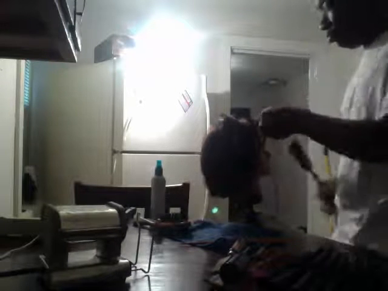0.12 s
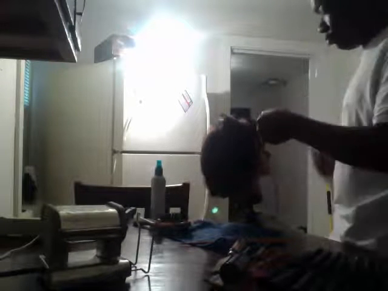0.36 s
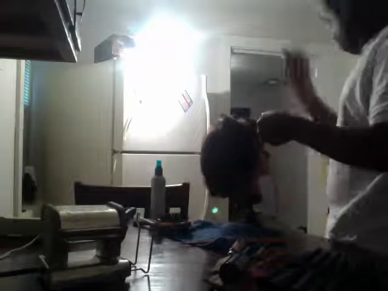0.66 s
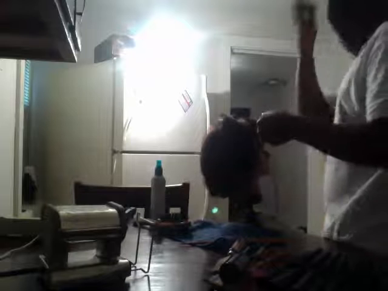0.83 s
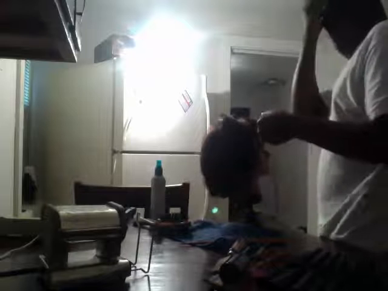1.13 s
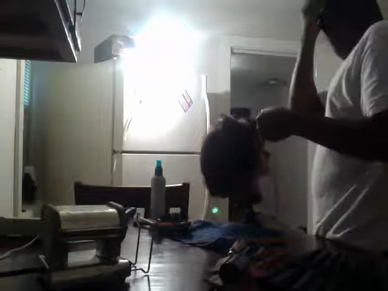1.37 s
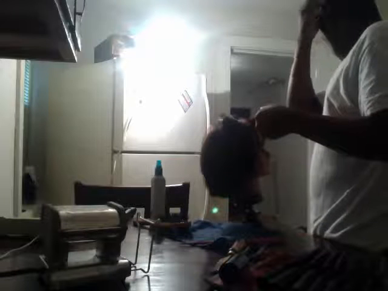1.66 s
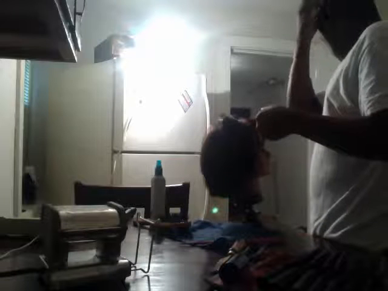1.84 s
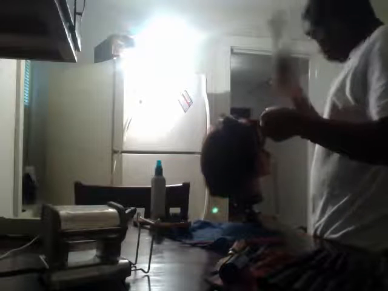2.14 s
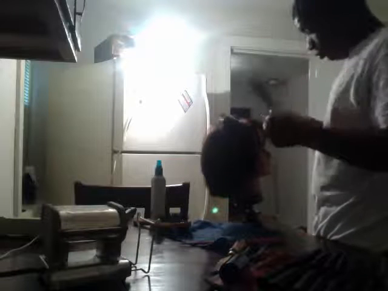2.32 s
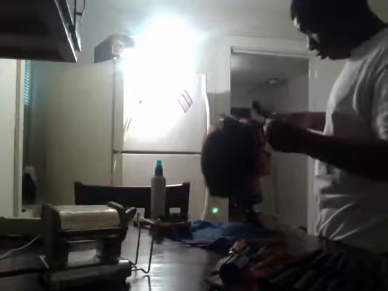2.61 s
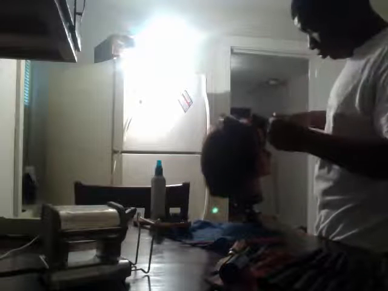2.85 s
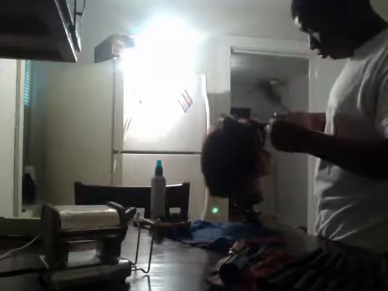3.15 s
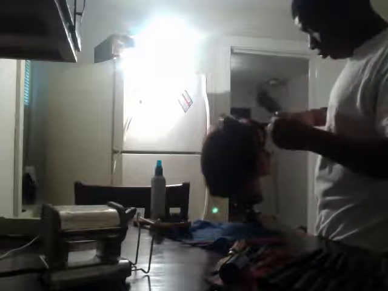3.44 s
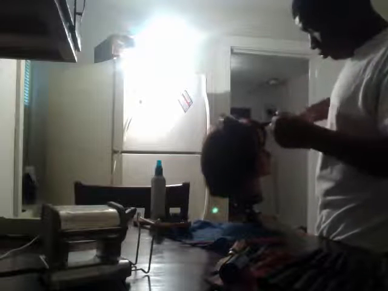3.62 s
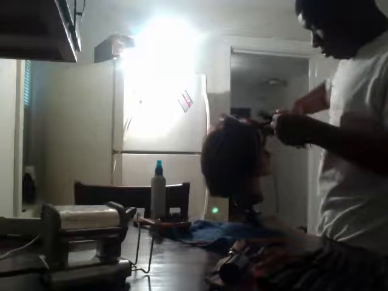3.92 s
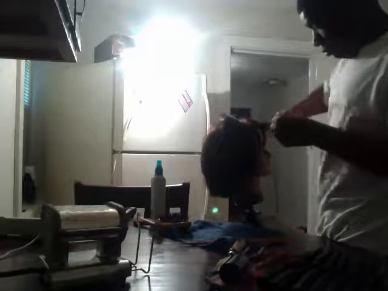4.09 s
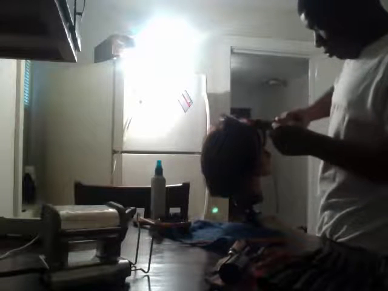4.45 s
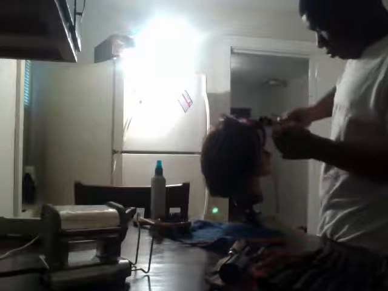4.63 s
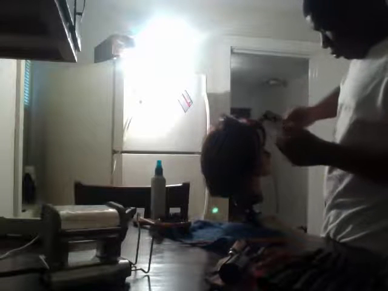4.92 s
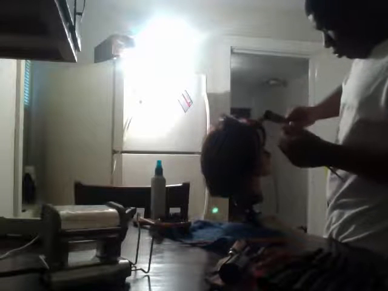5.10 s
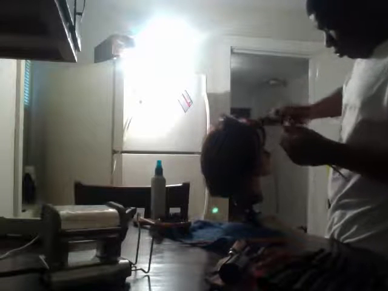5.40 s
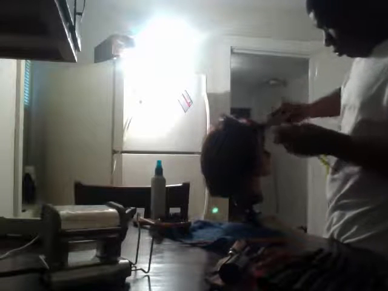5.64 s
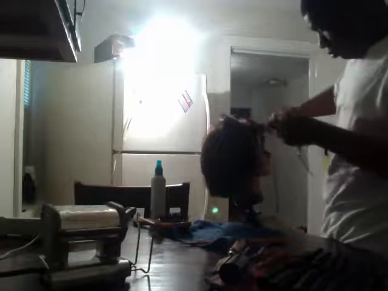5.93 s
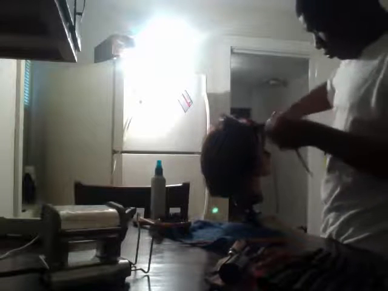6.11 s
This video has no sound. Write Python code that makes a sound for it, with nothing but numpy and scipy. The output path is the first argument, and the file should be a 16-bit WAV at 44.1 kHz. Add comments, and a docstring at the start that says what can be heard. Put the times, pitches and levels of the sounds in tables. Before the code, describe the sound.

A comb clicks crisply through a mannequin's hair, its stand knocking softly on the table, while a refrigerator hums quietly in the room.

```python
"""Sharp plastic snaps over hiss and hum: a comb and hands work through the hair of a mannequin head.
Each snap is a noise-like impulse shaped by the comb's resonances, with three ringing teeth and a wall tail.
Tugs rock the head's stand on the kitchen table in dull thuds: decaying modes under a knock of noise.
The comb scratches faintly by random ticks; fridge hum and room hiss are filtered noise that swells and sinks."""
import sys
import numpy as np
from scipy import signal
from scipy.fft import rfft, irfft
from scipy.io import wavfile

SR = 44100
rng = np.random.default_rng(int(sys.argv[2]) if len(sys.argv) > 2 else 0)


def waveform_to_disk(signal):
    """Save audio, clipped to [-1, 1], as 16-bit WAV at the path in sys.argv[1]."""
    frames = np.transpose(np.atleast_2d(signal))
    scaled = np.clip(frames, -1, 1) * 32767
    samples = np.round(scaled).astype(np.int16)
    wavfile.write(sys.argv[1], SR, samples)


N = 276066
T = np.arange(N) / SR  # time, s

# Slow swell of the background: time_s, level_db
BACKGROUND_SWELL = [(0.0, -61), (0.71, -61), (1.18, -63.5), (2.09, -62.5), (2.41, -63.5), (2.79, -69),
                    (3.07, -66.5), (3.42, -61.5), (3.75, -61.5), (3.99, -64.5), (4.39, -63.5),
                    (4.97, -68.5), (5.21, -65.5), (5.46, -60.5), (6.14, -64), (6.26, -67)]
# Spectrum of the room hiss: frequency_hz, relative_density_db (per Hz)
HISS_SPECTRUM = [(75, -36), (100, -20), (125, -5.5), (176, -0.5), (215, -7.5), (271, -7), (347, 0),
                 (462, -6.5), (823, -6.5), (1170, -13.5), (1600, -11), (1950, -19.5), (5700, -28),
                 (9740, -36.5), (14400, -51)]
# Fridge resonances: centre_hz, width_hz, level_db (relative to the swell)
FRIDGE_MODES = [(118, 4, -11.5), (169, 26, -8.5), (350.2, 3.9, -6), (549.7, 3.9, -10.5), (807, 6.3, -11),
                (1061, 40, -10.5), (1435.4, 37, -20), (3280, 25, -25), (5460, 27, -22), (7200, 200, -24.5)]
# Decay of the kitchen by frequency band: centre_hz, width_hz, t60_s
KITCHEN_DECAY = [(1190, 270, 0.21), (1980, 1600, 0.44), (3970, 1900, 0.4), (6230, 3000, 0.4),
                 (8700, 5500, 0.3), (11540, 2600, 0.38), (15000, 2300, 0.26)]
# Rocking of the stand: time_s, level_db, deep_lift_db, damping_factor (multiplies the decay rate)
STAND_THUDS = [(0.151, -48.5, 3, 0.75), (0.486, -41.5, 9, 6.6), (0.526, -50, 7, 4.6), (2.199, -46, 2.5, 1),
               (2.25, -57.5, 14, 1.05), (2.329, -57.5, 0, 0.85), (2.448, -61, -4.5, 0.69),
               (2.912, -60, -0.5, 1), (3.208, -45, -2.5, 1.06), (3.25, -68.5, 20.5, 3.1),
               (3.524, -57, 2.5, 0.9), (3.61, -64.5, 1.5, 0.31), (4.168, -68, -14, 0.7),
               (5.518, -65, -9, 0.98), (5.739, -75, 25, 0.69)]
# Modes of stand and table: frequency_hz, level_db, t60_s (at damping 1), lift_share (of deep_lift_db)
STAND_MODES = [(62, -39.5, .12, .8), (105, -11, 0.1, 1.2), (166.5, 0, 0.22, .9), (250.5, 8.5, 0.1094, 0),
               (380, -7.5, 0.066, .3)]
# Comb strokes through the hair: peak_s, level_db, top_relative_db, swell_s, fade_s
COMB_STROKES = [(0.95, -76.5, -19, .01, 0.045), (1.07, -82, -30, .08, .12),
                (1.29, -73.5, -3.5, 0.083, 0.047), (1.19, -85.5, -14, .1, .1),
                (1.414, -79.5, -19, 0.055, 0.13), (1.538, -80, -19, .1, 0.29), (1.7, -89, -15, .08, .08),
                (1.83, -72.5, 2.5, 0.05, 0.053), (1.92, -79, -10, .1, 0.14),
                (2.126, -85.5, -40, 0.13, 0.34), (5.342, -79, -11, .15, .08), (5.492, -82, -24, .02, .06)]
# Teeth snapping free of tangles: time_s, nominal_peak_db, body_db, edge_db, air_db (colours relative to
# 5.5 kHz), tooth_1_hz, tooth_2_hz, tooth_3_hz, ring_db, crack_db, echo_lag_ms, echo_share (capped at 0.9)
TOOTH_SNAPS = [(0.026, -48, 1.5, 1.5, -39, 7130, 3460, 5000, 1.5, 5, 0.33, 0.22),
               (0.0447, -52, 8, 11, -11, 6800, 2530, 13100, -3, 9, 0.37, 0.3),
               (0.0655, -52, -3, 4.5, -14, 5337, 6350, 10000, -1.5, 13, 0.34, 0.33),
               (0.2384, -19, -2, -1, 15.5, 5600, 6800, 14700, -8.5, 12, 0.47, 0.23),
               (0.2416, -17, -5, -0.5, 4.5, 4520, 14400, 8700, -7.5, 13, 0.45, 0.086),
               (0.2538, -22.5, -19.5, 2.5, -4.5, 7000, 9430, 5980, -7, 9.5, 0.43, 0.12),
               (0.4316, -49, -15, -26, -17, 3600, 4400, 8000, -3.5, 15.8, 0.24, 0.11),
               (0.5233, -32, -14, 0, 6.5, 5600, 4220, 9400, -6, 6.8, .47, 0.3),
               (0.5376, -33.5, -20, -5.5, -3, 5700, 7200, 14500, -18, 4.6, 0.6, .13),
               (0.6198, -47, 3.5, -12, -18, 4210, 7140, 5670, -5, 15.5, 0.44, 0.29),
               (0.725, -40, -29, -1, -15, 4220, 6650, 7060, -3, 9.4, .48, 1),
               (0.78, -48, -8, -15, -11, 3610, 6400, 8200, -0.5, 19.7, 0.44, 0.11),
               (0.8971, -42.5, -6.5, 6, -5, 9160, 6680, 13300, -5, 14.6, 0.38, 0.15),
               (1.0833, -57.5, 9, -16, -25, 3100, 5440, 4300, -16, 11, 0.34, .27),
               (1.5346, -57, 2, 5, -14, 8940, 6440, 10550, -9.5, 8.3, 0.35, .33),
               (3.024, -45.5, 3.5, 16.5, 4, 8800, 5830, 2800, -4.5, 10, .73, 0.35),
               (3.0358, -52, -16, 15.5, -6, 7600, 11900, 10100, -13.5, 14, 0.7, .4),
               (3.1327, -64, 19, 7, -24, 8800, 7340, 11650, -1, 6.2, 0.76, .4),
               (3.2381, -63, 8, 2, -18, 9440, 5700, 10810, 0, 9.3, 0.39, .25),
               (3.2977, -26, 5.5, 14, 14, 2560, 12400, 14500, -12, 1, 0.96, 0.48),
               (3.3025, -22, -12.5, -10, 0.5, 5680, 14620, 12350, -17, 4.6, 0.86, 0.1),
               (4.122, -55, -17.5, 7.5, -18.5, 4210, 5510, 10680, 4, 8.4, 0.48, 0.18),
               (5.1785, -49, 3, 30, -22, 8750, 11740, 3660, -4, 3.6, .34, .22),
               (5.225, -52.5, 4, -2.5, -6, 2166, 11750, 4200, 3.5, 4, .86, 0.1),
               (5.343, -55.5, 8, 22, -9, 10000, 8660, 5670, -2, 9, .52, 0.23),
               (5.485, -62, 0.5, 7, -28, 7620, 9070, 10000, -15.5, 9, .52, 0.23),
               (5.7972, -49.5, -25, -12.5, -10, 9090, 4580, 5940, 4.5, 3.5, .45, 0.24),
               (5.819, -46.5, -11, 21, -18, 9000, 4580, 3400, -3, 4.2, .57, .19)]
# Frequencies where the colour of a snap is set, lowest first: frequency_hz
SNAP_COLOUR_HZ = [800, 1400, 2500, 5500, 9600, 12000, 14500]
# Body resonances of the comb: centre_hz, width_hz, lift_db
COMB_MODES = [(1900, 290, 4), (3500, 170, 1), (4160, 650, 5), (5840, 190, 4), (6000, 300, 2.5),
              (7050, 550, 4.5), (7430, 350, 4.5), (8150, 270, 5.5), (9300, 650, 6.5), (10240, 500, 4.5),
              (11250, 610, -6), (13200, 2100, 2), (12800, 610, -0.5), (14910, 660, 9)]
# Decay of the three ringing teeth, strongest first: level_db (before levelling by decay length), t60_s
TOOTH_DECAY = [(1.5, .012), (-4.5, 0.0099), (-8, .005)]

PUSH_S = 0.019  # rise time of a thud
STROKE_SPAN_DB = 20  # gained over a swell, lost over a fade
BASS_DB, LOW_DB = -44, -14  # two lowest colour points, relative to the body
EDGE_REACH = 0.6  # share of the edge colour at 12 kHz
CRACK_MS = 2.9  # the crack's envelope peaks at half this time
TOP_HZ = 15750  # upper limit of the phone


def undb(db):
    """Amplitude ratio of a level in dB."""
    return 10 ** (np.asarray(db) / 20)


def unit(x):
    """Normalisation to an rms of 1."""
    return x / np.sqrt(np.mean(x ** 2))


def band(x, hz, width_hz, order=2):
    """Resonant selection: a band-pass around a centre frequency."""
    edges = [max(hz - width_hz / 2, 10), min(hz + width_hz / 2, 0.48 * SR)]
    return signal.sosfilt(signal.butter(order, edges, "band", fs=SR, output="sos"), x)


def add(out, s, x):
    """Superposition: a short sound is summed in at time s."""
    i = int(s * SR)
    out[i:i + len(x)] += x[:N - i]


def background(hiss_db=3, rumble_db=-27.5):
    """Filtered noise: broad bands give hiss, narrow ones wavering fridge tones, all on one slow swell."""
    hz, density_db = np.transpose(HISS_SPECTRUM)
    f = np.maximum(np.fft.rfftfreq(N, 1 / SR), 1)
    colour = undb(np.interp(np.log(f), np.log(hz), density_db))
    hiss = unit(irfft(rfft(rng.standard_normal(N)) * colour, N))
    hiss += undb(rumble_db) * unit(band(rng.standard_normal(N), 55, 42))  # faint rumble of the house
    hum = np.zeros(N)
    for centre_hz, width_hz, level_db in FRIDGE_MODES:
        hum += undb(level_db) * unit(band(rng.standard_normal(N), centre_hz, width_hz, order=1))
    swell = undb(np.interp(T, *np.transpose(BACKGROUND_SWELL)))
    return (undb(hiss_db) * hiss + hum) * swell


def kitchen(x, wet_db=-19, early_db=4, early_s=0.0073):
    """Reverberation: convolution with dense noise that decays at its own rate in each band."""
    t = np.arange(SR // 2) / SR
    tail = np.zeros(len(t))
    for hz, width_hz, t60_s in KITCHEN_DECAY:
        tail += band(rng.standard_normal(len(t)), hz, width_hz) * 1000. ** (-t / t60_s)
    # the nearby table and cupboards answer first
    tail *= undb(wet_db + early_db * np.exp(-t / early_s)) * np.clip(t / 0.0036, 0, 1)
    tail *= np.exp(-(t / 0.39) ** 4)  # the last of it escapes through the open doorways
    return signal.fftconvolve(x, tail)[:N]


def thuds(knock_db=-9, knock_follows=0.87):
    """Modal excitation: a soft push lets stand and table modes swell, then decay under a dull knock."""
    out, t = np.zeros(N), np.arange(SR // 2) / SR
    push = np.minimum(t / PUSH_S, 1) ** 2
    since_push = np.maximum(t - PUSH_S, 0)
    hz, mode_db, t60_s, lift_share = np.transpose(STAND_MODES)[..., None]
    for s, level_db, deep_db, damping in STAND_THUDS:
        detune = 1 + 0.011 * rng.standard_normal(hz.shape)
        modes = undb(mode_db + lift_share * deep_db) * np.sin(2 * np.pi * hz * detune * t)
        body = np.sum(modes * 1000. ** (-damping * since_push / t60_s), axis=0)
        knock = unit(band(rng.standard_normal(len(t)), 360, 330)) * np.exp(-t / 0.025)
        knock *= undb(knock_db + knock_follows * deep_db)
        add(out, s - PUSH_S / 2, undb(level_db) * push * (body + knock))
    return out


def scratch(slips_per_s=2500, scatter_db=3):
    """Stick-slip: hairs leave the teeth as dense random ticks that swell and fade with each stroke."""
    slip, sign, size = rng.random((N, 3)).T
    ticks = (slip < slips_per_s / SR) * np.sign(sign - 0.5)
    ticks = ticks * undb(-scatter_db * np.log(1 - size))  # exponentially spread in dB
    mid, top = unit(band(ticks, 5000, 6800)), unit(band(ticks, 12000, 5110))
    out = np.zeros(N)
    for s, level_db, top_db, swell_s, fade_s in COMB_STROKES:
        away = np.where(T < s, (s - T) / swell_s, (T - s) / fade_s)
        out += undb(level_db - STROKE_SPAN_DB * away) * (mid + undb(top_db) * top)
    return out


def snaps(crest_db=20, ragged_db=4.0, ragged_hz=350):
    """Impulsive release: comb resonances and three teeth ring; returns direct crack and sound for the walls."""
    direct, spread, t = np.zeros(N), np.zeros(N), np.arange(2048) / SR
    f, lead_s = np.fft.rfftfreq(len(t), 1 / SR), 0.002
    lift_db = sum(db / (1 + (2 * (f - hz) / width) ** 2) for hz, width, db in COMB_MODES)
    comb = undb(lift_db) * np.exp(-2j * np.pi * f * lead_s)  # delayed by the lead
    since = np.maximum(t - lead_s, 0)
    # the square root offsets the smaller energy of a short decay
    fading = np.array([undb(db) * 1000. ** (-since / t60) / np.sqrt(t60) for db, t60 in TOOTH_DECAY])
    for s, peak_db, body_db, edge_db, air_db, *teeth_hz, ring_db, crack_db, lag_ms, share in TOOTH_SNAPS:
        reach_db = air_db + EDGE_REACH * (edge_db - air_db)
        colour_db = [body_db + BASS_DB, body_db + LOW_DB, body_db, 0, edge_db, reach_db, air_db]
        per_hz_db = colour_db - 10 * np.log10(SNAP_COLOUR_HZ)
        # uneven small resonances
        ragged = ragged_db * np.interp(f / ragged_hz, np.arange(128), rng.standard_normal(128))
        colour = undb(np.interp(f, SNAP_COLOUR_HZ, per_hz_db) + ragged)
        # reflection off the head or hand beside the comb
        echo = 1 + np.clip(share, 0, 0.9) * np.exp(-2j * np.pi * f * lag_ms / 1000)
        ring = np.sum(np.sin(2 * np.pi * np.outer(teeth_hz, since)) * fading, axis=0)
        snap = unit(irfft(comb * echo * colour)) + undb(ring_db) * unit(ring)
        burst = rng.standard_normal(len(t)) * t * np.exp(-t * 2000 / CRACK_MS)
        crack = unit(signal.fftconvolve(snap, burst)[:len(t)])
        add(spread, s - lead_s, undb(peak_db - crest_db) * snap)
        add(direct, s - lead_s, undb(peak_db - crest_db + crack_db) * crack)
    return band(direct, 7700, 10000, order=1), spread  # the hand shades the very top of the crack


def scene():
    """Direct and reverberant paths: comb sounds take both, but thuds and background arrive as they are."""
    direct, spread = snaps()
    comb = scratch()
    return (direct + comb + kitchen(spread + comb) + thuds() + background())[None]


def record(dry):
    """Band limitation: the phone drops the deep bass and cuts the top."""
    dry = signal.sosfilt(signal.butter(3, 55, "high", fs=SR, output="sos"), dry)
    return signal.sosfilt(signal.ellip(8, 0.2, 60, TOP_HZ, fs=SR, output="sos"), dry)


dry = scene()
out = record(dry)
waveform_to_disk(out)
```